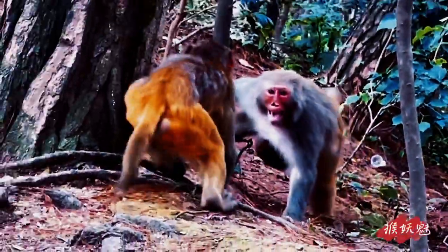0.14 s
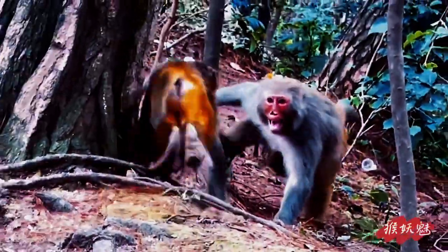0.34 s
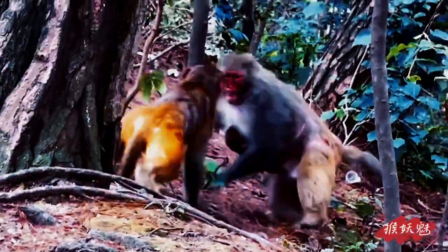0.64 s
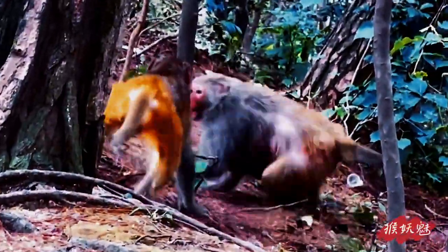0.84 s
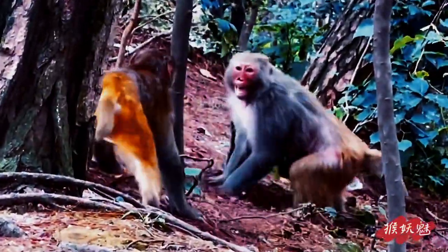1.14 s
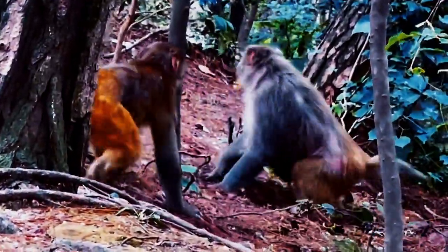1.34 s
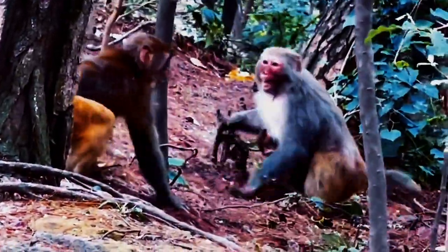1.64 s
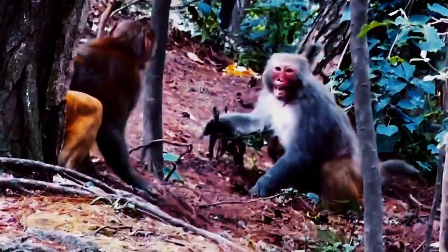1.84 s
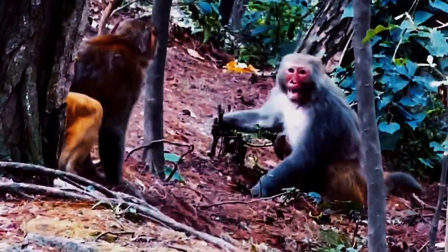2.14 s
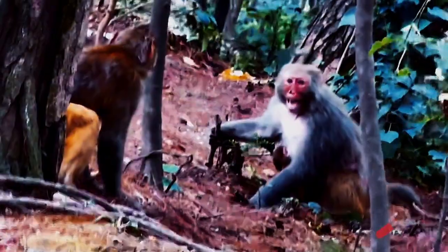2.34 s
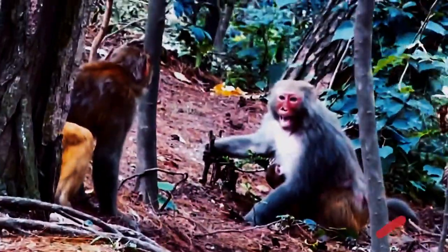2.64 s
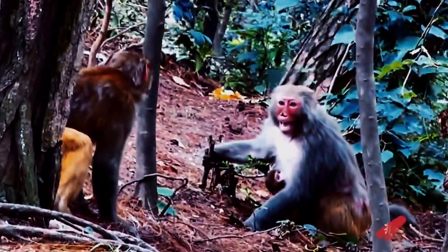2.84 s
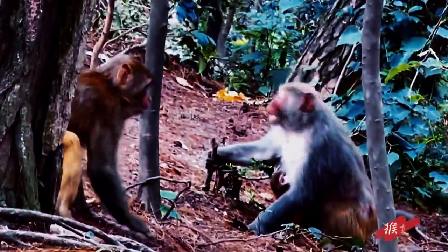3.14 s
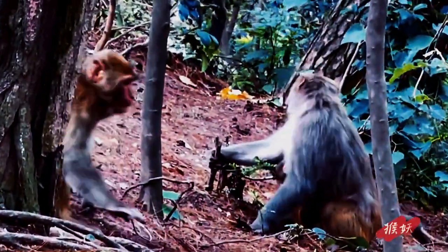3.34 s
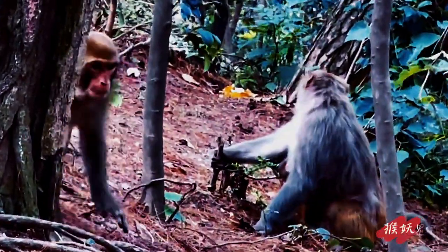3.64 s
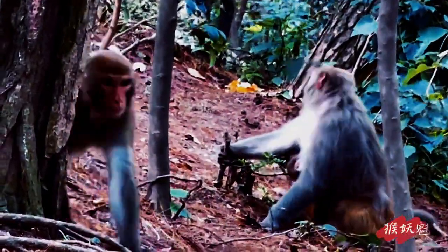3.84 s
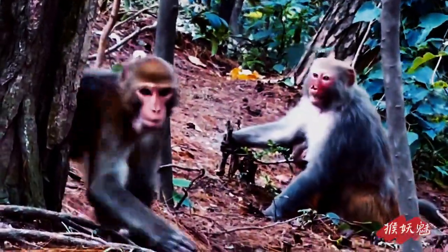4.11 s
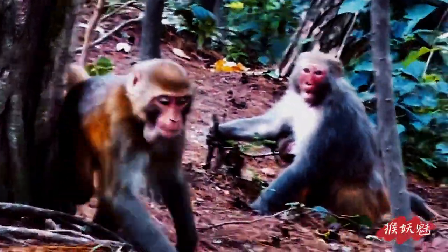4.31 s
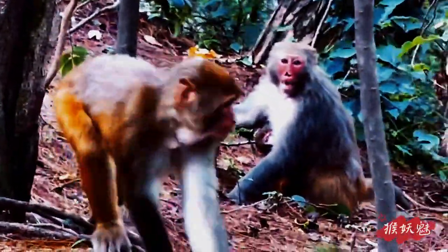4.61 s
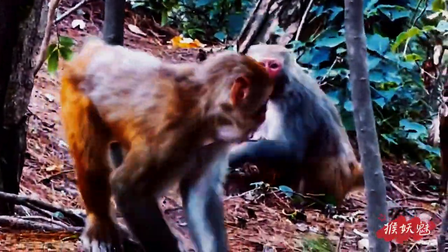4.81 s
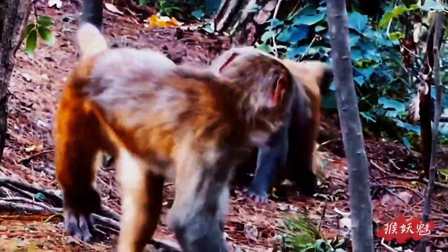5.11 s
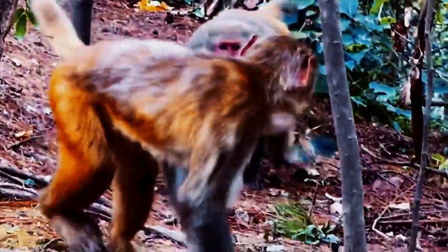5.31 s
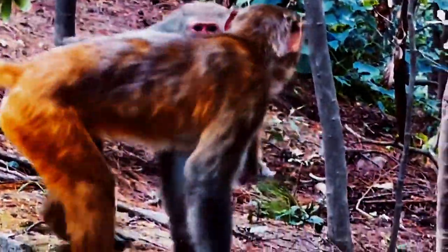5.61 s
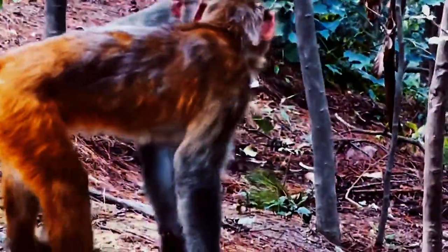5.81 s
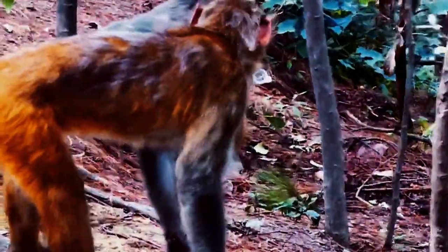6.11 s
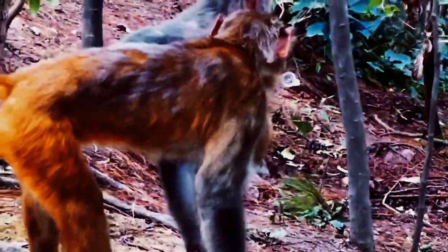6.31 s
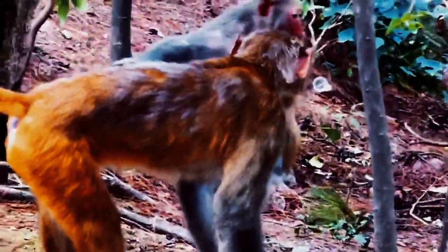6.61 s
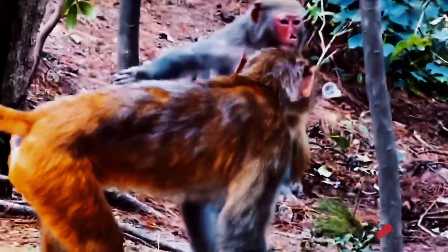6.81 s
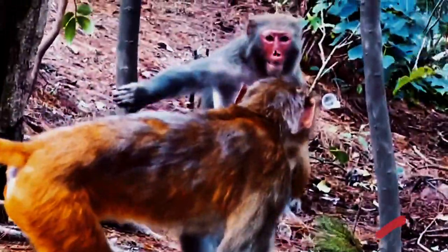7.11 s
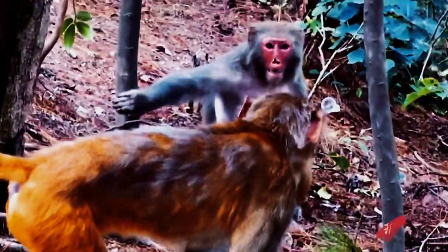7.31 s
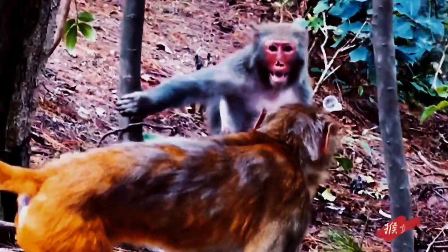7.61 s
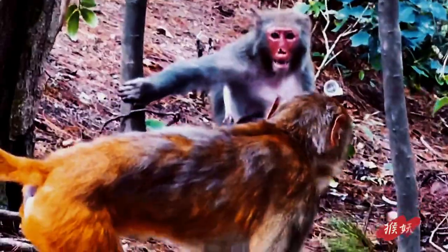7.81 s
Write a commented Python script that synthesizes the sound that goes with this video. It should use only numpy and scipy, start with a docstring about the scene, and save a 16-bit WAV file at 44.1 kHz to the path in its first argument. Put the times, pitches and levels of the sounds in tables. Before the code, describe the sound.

Close, harsh monkey shrieks come in rapid pulsed clusters, thinning between bouts to quiet woods, while brief voice breaks, croaks and twig snaps punctuate the quarrel.

```python
"""Macaques squabble on a forest floor a few steps from a small two-port microphone.
From 0 s screams and yelps, a whistle and breath chopped by fast fold flutter, ring over the rumble and hiss
of the woods; trunks echo them. From 0.3 s come harmonic squeals and whoops, damped snaps of twigs and feet,
and hoarse croaks; groans sag from 1.3 s, voices break upward from 4.4 s; just after 6.6 s the leaf hiss fades."""
import sys
import numpy as np
from scipy import signal
from scipy.fft import rfft, irfft
from scipy.io import wavfile
from scipy.ndimage import uniform_filter1d

SR = 44100
rng = np.random.default_rng(int(sys.argv[2]) if len(sys.argv) > 2 else 0)


def wav_out(sig):
    """Save sig, one row per channel (or a flat mono array), as 16-bit PCM at SR to the path in sys.argv[1]."""
    wavfile.write(sys.argv[1], SR, np.round(np.clip(np.atleast_2d(sig).T, -1, 1) * 32767).astype(np.int16))


def ratio_of_db(decibels):
    """Turn decibels (scalar or array-like) into linear amplitude factors; 0 dB maps to 1."""
    return 10 ** (np.asarray(decibels, float) / 20)


N = 350595

# woods spectrum: (frequency [Hz], relative density [dB])
WOODS = [(55, -1.5), (75, 1.5), (120, -8), (250, -16.5), (700, -23), (2000, -31.5), (7000, -48),
         (11000, -66)]
WOODS_RMS_DB = -38
# rustle of leaves as an animal shifts, end values held: (time [s], rms level [dB])
RUSTLE = [(6.3, -52), (6.62, -53.5), (6.7, -61)]

# pace of the fold flutter: (time [s], mean pace [bursts per s])
FLUTTER = [(0, 291), (1.4, 271), (1.599, 300), (2.7, 278), (3.401, 376), (5.52, 290), (5.6, 308),
           (5.669, 250)]
# throat resonances under the rasp, low then high: (frequency [Hz], pole width [Hz], relative level [dB])
THROAT = [(2550, 315, 1), (3300, 1120, -5), (4167, 710, 0.5)]
MOUTH = [(5590, 1810, 8), (8220, 1230, -6), (10360, 1920, 3), (11600, 1200, -35)]

# drawn-out screams:
# (start [s], length [s], effort at height [dB], whistle at height [Hz], treble re effort at height [dB])
SCREAMS = [(0, 0.38, -28, 4490, -1), (0.777, 0.6, -28, 5865, 3), (3.36, 0.57, -40.5, 5600, 6),
           (5.35, 0.25, -26.5, 6250, -8.5), (5.542, 0.093, -21.5, 4600, 2), (7.455, .09, -37, 4500, 4)]
# whistle at the ends; effort and treble at the ends re the height; extra fall at the very end
SCREAM_END_HZ, SCREAM_END_DB, SCREAM_END_TREBLE_DB, SCREAM_DYING_DB = 4000, -1.5, -10, -10
SCREAM_LEAN, SCREAM_FLAT = .85, .6  # exponents that shape the arch
# hoarse rising starts of a bout: (start [s], length [s], peak effort [dB], first pitch [Hz], last pitch [Hz])
CROAKS = [(0.529, 0.071, -29.5, 897, 2610), (2.358, .026, -38.5, 1000, 1498),
          (4.846, .026, -39, 1100, 1800), (3.195, .035, -44, 700, 1000), (5.292, .018, -38, 1000, 1500),
          (6.234, .075, -38, 999, 1901), (7.428, .025, -38, 1000, 1507)]
CROAK_TREBLE_DB = -13
# hoarse groans as a bout runs out of breath:
# (start [s], length [s], first effort [dB], first pitch [Hz], last pitch [Hz])
GROANS = [(1.336, 0.058, -19, 2187, 1206), (1.939, 0.22, -14.5, 3712, 1400), (2.68, .19, -16, 2950, 1300),
          (6.081, .08, -31, 2336, 1287)]
GROAN_FADE_DB, GROAN_FADE_BEND, GROAN_SAG_BEND, GROAN_TREBLE_DB = -22.5, 1.2, 2.6, -14

# short pulsed yelps:
# (loudest time [s], length [s], top effort [dB], lowest whistle [Hz], treble re effort [dB])
YELPS = [(.024, 0.065, -13.5, 2600, -9.5), (.125, 0.088, -11.5, 2650, -24), (0.224, 0.096, -11, 2450, -22),
         (.309, .062, -12, 2700, -10.5), (0.649, 0.063, -15.5, 3300, -12), (.752, 0.093, -13.5, 2400, -9.5),
         (0.863, 0.089, -16.5, 2450, -13), (0.97, .067, -25.5, 2900, 4), (1.063, 0.072, -18.5, 2400, 0),
         (1.156, .074, -16, 2450, -2), (1.249, 0.081, -13, 2500, -7), (1.334, 0.068, -18, 2200, -11),
         (1.721, 0.068, -12, 3300, -7), (1.828, 0.082, -15, 2550, -6), (1.919, .076, -14.5, 2600, -8),
         (2.491, 0.067, -8, 3000, -18.5), (2.586, 0.082, -9.5, 2900, -17.5),
         (2.667, 0.063, -9, 3000, -18.5), (3.331, 0.059, -25.5, 2900, -10), (3.818, .082, -28, 2550, -19),
         (4.486, 0.018, -20.5, 3000, -16), (4.961, 0.051, -15, 2900, -9), (5.643, .053, -9, 2650, -19.5),
         (5.696, 0.062, -12.5, 3100, -22), (5.747, .05, -22, 2300, -12), (5.837, 0.07, -9.5, 2550, -20.5),
         (5.95, .078, -15.5, 2500, -13), (6.048, 0.072, -15.5, 2450, -19), (7.579, 0.03, -14, 2803, -15)]
YELP_RISE_SHARE = .45

# clean squeals inside a bout: (start [s], length [s], first level [dB], first pitch [Hz], last pitch [Hz])
SQUEALS = [(0.322, .061, -17, 2620, 2287), (2.008, 0.14, -25, 2646, 1675),
           (2.736, 0.064, -21.5, 3706, 2480), (5.768, .05, -21, 2230, 3200),
           (5.844, 0.027, -14, 2523, 2575)]
SQUEAL_FADE_DB, SQUEAL_SLIDE_BEND = -4, .85
# clean rising whoops: (start [s], length [s], level once open [dB], first pitch [Hz], last pitch [Hz])
WHOOPS = [(0.564, 0.021, -25.5, 1710, 2720), (1.601, .033, -27.5, 699.7, 2020),
          (2.38, .033, -26, 1420, 2265), (3.199, .028, -35, 1150, 1800), (3.236, 0.021, -35, 1407, 1960),
          (4.318, 0.051, -27, 880, 2000), (4.368, .012, -26, 1906, 2490), (4.869, .031, -23, 1657, 2380),
          (5.307, 0.018, -25.5, 1497, 2308), (6.272, 0.019, -34, 1384, 2248),
          (7.435, 0.047, -25.5, 960, 2113)]
# muffled below the open pitch; overtones weaken per dB below the full level
WHOOP_OPEN_HZ, WHOOP_MUFFLE_DB_PER_OCTAVE = 1726, 17
WHOOP_FULL_DB, WHOOP_DULLING_DB_PER_DB = -24, 1.1
# what the throat lets out of a partial, applied re the fundamental: (frequency [Hz], gain [dB])
WHOOP_THROAT = [(1500, -3), (3200, 3.5), (4500, -6), (7000, -8.5), (13000, -7.5)]
# voice breaking upward out of a whoop:
# (start [s], length [s], level under the accent [dB], first pitch [Hz], highest pitch [Hz])
BREAKS = [(4.377, 0.094, -29.5, 3006, 4040), (4.895, .019, -28, 2980, 3840), (5.325, .03, -27, 2600, 3650),
          (7.479, 0.058, -30.5, 2857, 4280)]
BREAK_ACCENT_DB, BREAK_ACCENT_S, BREAK_CREST_SHARE = 10.5, 0.013, .85
THIN_DB = -8  # overtones of breaks and squeals re those of a full whoop
WOBBLE_SHARE = .012  # slow rms pitch wobble of every clean call

# twigs and feet: (time [s], ring onset level [dB], ring [Hz], t60 [s])
SNAPS = [(.403, -13, 570, 0.01), (0.406, -20.5, 85, 0.13), (3.606, -23.5, 1620, 0.0061),
         (6.369, -28, 2600, 0.008), (6.375, -21.5, 2400, 0.014)]

# phase between the two output channels, left ahead where positive: (frequency [Hz], phase [half turns])
CHANNEL_PHASE = [(60, 0), (700, -.17), (1500, 0), (3800, .12), (4400, .4), (4850, 1), (5200, 1.7),
                 (5600, 2), (6400, 2), (8300, 3), (9550, 3), (9700, 4), (10300, 4.1), (10950, 5),
                 (11600, 6), (13100, 6), (14300, 7)]
# likeness of the channels: (frequency [Hz], correlation [0 to 1])
ALIKE = [(130, 1), (700, .62), (1300, .96), (3800, .9), (4900, .85), (5600, 1), (6400, 1), (7400, .5),
         (8300, 1), (9700, 1), (10800, .6), (11800, 1)]
# left minus right: (frequency [Hz], level difference [dB])
BALANCE_DB = [(130, 0), (400, 3.5), (1000, 0)]
# microphone response: (frequency [Hz], gain [dB])
MICROPHONE = [(25, -25), (58, -0.5), (12300, -1.5), (12600, -22), (15000, -4)]


def evened(x):
    """Scales to rms 1."""
    return x / np.sqrt(np.mean(x ** 2) + 1e-20)


def read(points, hz):
    """Reads a spectrum on a log-frequency axis."""
    f, value = np.transpose(points)
    return np.interp(np.log(hz + 1), np.log(f + 1), value)


def wander(size, span):
    """Slow chance of rms 1 that changes over span samples."""
    noise = rng.standard_normal(size)
    return evened(uniform_filter1d(uniform_filter1d(noise, span), span))


def resonate(x, hz, width_hz):
    """Double-pole resonance of gain 1: shifts hz down to 0, low-passes, shifts back."""
    turn = np.exp(2j * np.pi * np.cumsum(hz * np.ones(len(x))) / SR)
    r = np.exp(-np.pi * width_hz / SR)
    return 2 * (turn * signal.lfilter([(1 - r) ** 2], [1, -2 * r, r * r], x / turn)).real


def through(x, modes):
    """Sums fixed resonances with alternating sign, to rms 1."""
    total = 0
    for k, (hz, width_hz, db) in enumerate(modes):
        total = total + (-1) ** k * ratio_of_db(db) * resonate(x, hz, width_hz)
    return evened(total)


def rasp(effort, hz, treble_db, air, cycles, throat_db, blur_hz,
         jitter=.04, shimmer_db=1.5, leak=.07, octave_db=-6):
    """A wavering whistle and breath noise, both chopped into bursts by the flutter."""
    pace_hz = np.interp(np.arange(N) / SR, *np.transpose(FLUTTER)) * (1 + jitter * wander(N, span=120))
    turns = np.cumsum(pace_hz) / SR
    index = turns.astype(int)
    strength = ratio_of_db(shimmer_db * rng.standard_normal(4000))[index]
    age = turns % 1 * hz / pace_hz / cycles  # a burst lasts a few whistle cycles, so high screams click
    burst = strength * (age * np.exp(1 - age)) ** 2 + leak
    angle = 2 * np.pi * np.cumsum(hz + blur_hz * wander(N, span=40)) / SR
    angle += .5 * rng.standard_normal(4000)[index]  # the whistle restarts out of step in each burst
    pulses = evened(np.diff(np.floor(turns), prepend=0) * strength)
    breath = (1 - air) * pulses + air * evened(burst * rng.standard_normal(N))
    whistle = evened(burst * np.cos(angle))
    octave = evened(burst ** 2 * np.cos(2 * angle))
    low = whistle + ratio_of_db(throat_db + treble_db / 2) * through(breath, THROAT)
    treble = through(breath, MOUTH) + ratio_of_db(octave_db) * octave
    return effort * (evened(low) + ratio_of_db(treble_db) * treble)


def woods():
    """Random short-time spectra: patchy hiss, lumps in the bass, and a leaf rustle, for two channels."""
    frames, hz = N // 256 + 5, np.fft.rfftfreq(1024, 1 / SR)
    real, imag = rng.standard_normal((2, 2, len(hz), frames))
    patches = rng.standard_normal((len(hz), frames))
    patches = evened(uniform_filter1d(uniform_filter1d(patches, size=10, axis=0), size=14, axis=1))
    lumps = wander(frames, span=12) / (1 + (hz[:, None] / 150) ** 2)
    flicker_db = 1.2 * patches + 2.5 * lumps
    spectra = (real + 1j * imag) * ratio_of_db(read(WOODS, hz)[:, None] + flicker_db)
    hiss = signal.istft(spectra, nperseg=1024, noverlap=768)[1][:, :N]
    leaf_modes = [(7450, 7900, -5), (10750, 620, -6)]
    leaves = [through(noise, leaf_modes) for noise in rng.standard_normal((2, N))]
    rustle_db = np.interp(np.arange(N) / SR, *np.transpose(RUSTLE))
    return ratio_of_db(WOODS_RMS_DB) * evened(hiss) + ratio_of_db(rustle_db) * leaves


def screams():
    """Arched screams, rising croaks and sagging groans drive a rasp hoarser than the yelps'."""
    effort, hz, treble_db = np.zeros(N), np.full(N, 2600.), np.zeros(N)

    def during(start_s, length_s):
        """Sample range of a call and its course from 0 to 1."""
        at = slice(round(start_s * SR), round((start_s + length_s) * SR))
        return at, np.linspace(0, 1, at.stop - at.start)

    for start_s, length_s, db, top_hz, bright_db in SCREAMS:
        at, u = during(start_s, length_s)
        low = 1 - abs(np.sin(np.pi * u ** SCREAM_LEAN)) ** SCREAM_FLAT  # 0 at the height, 1 at the ends
        effort[at] = ratio_of_db(db + SCREAM_END_DB * low + SCREAM_DYING_DB * u ** 10.6)
        hz[at] = top_hz + (SCREAM_END_HZ - top_hz) * low
        treble_db[at] = bright_db + SCREAM_END_TREBLE_DB * low
    for start_s, length_s, db, first_hz, last_hz in GROANS:
        at, u = during(start_s, length_s)
        effort[at] = ratio_of_db(db + GROAN_FADE_DB * u ** GROAN_FADE_BEND)
        hz[at] = first_hz + (last_hz - first_hz) * u ** GROAN_SAG_BEND
        treble_db[at] = GROAN_TREBLE_DB
    for start_s, length_s, db, first_hz, last_hz in CROAKS:
        at, u = during(start_s, length_s)
        effort[at] = ratio_of_db(db) * abs(np.sin(np.pi * u)) ** .5
        hz[at] = first_hz + (last_hz - first_hz) * u
        treble_db[at] = CROAK_TREBLE_DB
    effort = uniform_filter1d(effort, size=400)
    return rasp(effort, hz, treble_db, air=.75, cycles=2.6, throat_db=-6, blur_hz=350)


def yelps(edge_db=-15, swoop_share=.5, lift_share=.2):
    """Each yelp swells to its top while the whistle swoops down, then lifts a little as it dies."""
    t = np.arange(N) / SR
    effort, hz, treble_db = np.zeros(N), np.full(N, 2600.), np.zeros(N)
    for top_s, length_s, db, low_hz, bright_db in YELPS:
        side_share = np.where(t < top_s, YELP_RISE_SHARE, 1 - YELP_RISE_SHARE)
        off = (t - top_s) / length_s / side_share  # -1 at the start, 0 at the top, 1 at the end
        on = abs(off) < 1
        off = off[on]
        effort[on] = ratio_of_db(db + edge_db * abs(off) ** 2.6)
        hz[on] = low_hz * (1 + np.where(off < 0, swoop_share, lift_share) * off ** 2)
        treble_db[on] = bright_db
    effort = uniform_filter1d(effort, size=200)
    return rasp(effort, hz, treble_db, air=.55, cycles=3.4, throat_db=2, blur_hz=130)


def trunks(x, t60_s=0.5, treble_t60_s=0.35):
    """Echoes scattered by the trees: sparse taps that die faster in the treble."""
    taps = rng.choice([-1., 1.], SR) * (rng.random(SR) < .05) * (np.arange(SR) > 300)
    hz, t, z = signal.stft(taps, SR, nperseg=256)
    decay_s = read([(2000, t60_s), (10000, treble_t60_s)], hz)[:, None]
    tail = signal.istft(z * ratio_of_db(-60 * t / decay_s), SR, nperseg=256)[1]
    return signal.fftconvolve(x, tail / np.linalg.norm(tail))[:N]


def glides():
    """Yields start [s], pitch curve [Hz], level curve [dB] and overtone level [dB] of every clean call."""
    for start_s, length_s, db, first_hz, last_hz in SQUEALS:
        u = np.linspace(0, 1, round(length_s * SR))
        hz = first_hz + (last_hz - first_hz) * u ** SQUEAL_SLIDE_BEND
        yield start_s, hz, db + SQUEAL_FADE_DB * u, THIN_DB
    for start_s, length_s, db, first_hz, last_hz in WHOOPS:
        u = np.linspace(0, 1, round(length_s * SR))
        hz = first_hz + (last_hz - first_hz) * u
        muffle_db = WHOOP_MUFFLE_DB_PER_OCTAVE * np.minimum(np.log2(hz / WHOOP_OPEN_HZ), 0)
        yield start_s, hz, db + muffle_db, WHOOP_DULLING_DB_PER_DB * min(db - WHOOP_FULL_DB, 0)
    for start_s, length_s, db, first_hz, top_hz in BREAKS:
        u = np.linspace(0, 1, round(length_s * SR))
        hz = first_hz + (top_hz - first_hz) * (1 - (1 - u / BREAK_CREST_SHARE) ** 2)
        accent_db = BREAK_ACCENT_DB * np.exp(-u * length_s / BREAK_ACCENT_S)
        yield start_s, hz, db + accent_db, THIN_DB


def whoops(slope_db=-5, flicker_db=2.2, waver_share=.009, hoarse_rad=.25, breath_db=-14, hiss_db=-23):
    """Harmonic glides coloured by the throat, the upper partials blurred, over some breath."""
    out = np.zeros(N)
    noise = rng.standard_normal(N)
    breath = ratio_of_db(breath_db) * through(noise, THROAT + [(1270, 2450, 0)])
    air = breath + ratio_of_db(hiss_db) * through(noise, MOUTH)
    for start_s, hz, db, overtone_db in glides():
        size, start = len(hz), round(start_s * SR)
        at = slice(start, start + size)
        hz = hz * (1 + waver_share * wander(size, span=70) + WOBBLE_SHARE * wander(size, span=350))
        angle = 2 * np.pi * np.cumsum(hz) / SR
        shake = hoarse_rad * wander(size, span=25)
        stack = np.zeros(size)
        for k in range(1, 6):
            throat_db = read(WHOOP_THROAT, k * hz) - read(WHOOP_THROAT, hz)
            partial_db = slope_db * (k - 1.5) + overtone_db * (k > 1) + throat_db
            stack += ratio_of_db(partial_db) * np.cos(k * angle + (k - 1) * shake)
        level = ratio_of_db(db + flicker_db * wander(size, span=90))
        out[at] += level * (np.sqrt(2) * stack + air[at]) * signal.windows.tukey(size, .2)
    return out


def snaps(crack=1.0):
    """Each is a damped ring under a brief noise crack, weaker for rings below 2 kHz."""
    out, t = np.zeros(N), np.arange(6000) / SR
    for start_s, db, hz, t60_s in SNAPS:
        ring = ratio_of_db(-60 * t / t60_s) * np.sin(2 * np.pi * hz * t)
        click = crack * min(hz / 2000, 1) * np.exp(-t / 0.00033) * rng.standard_normal(len(t))
        out[round(start_s * SR):][:len(t)] += ratio_of_db(db) * (ring + click)
    return out


def scene():
    """What both channels share, and what differs between them, spread by likeness, phase and balance."""
    near = screams() + yelps() + whoops() + snaps()
    shared, other = woods()
    wet = near + ratio_of_db(-12.5) * trunks(near)
    shared = rfft(shared + wet)
    other = rfft(other + wet * wander(N, span=150))
    hz = np.fft.rfftfreq(N, 1 / SR)
    spread = np.arccos(np.clip(read(ALIKE, hz), 0, 1)) / 2
    # each channel takes half the phase and half the level difference
    tilt = np.exp(.5j * np.pi * read(CHANNEL_PHASE, hz)) * ratio_of_db(read(BALANCE_DB, hz) / 2)
    response = ratio_of_db(read(MICROPHONE, hz))
    mid = response * np.cos(spread) * shared
    side = response * np.sin(spread) * other
    return irfft([(mid + side) * tilt, (mid - side) / tilt], N)


def roll_off(x):
    """The treble ends steeply here."""
    return signal.sosfilt(signal.butter(12, 15750, fs=SR, output="sos"), x)


def record(dry, knee_db=-34, share=0.18, recover_db_per_s=17.5, gain_db=5):
    """Gain control dips everything under and after loud sounds; then a soft overload."""
    power_db = 10 * np.log10(abs(uniform_filter1d((dry ** 2).mean(0), size=2000)) + 1e-12)
    fall_db = np.arange(N) * recover_db_per_s / SR
    held_db = np.maximum.accumulate(power_db + fall_db) - fall_db  # instant rise, steady fall
    over_db = np.maximum(held_db - knee_db, 0)
    ducked = dry * ratio_of_db(gain_db - share * uniform_filter1d(over_db, size=2000))
    mix = 1.2 * np.tanh(ducked / 1.2)
    return roll_off(mix)


dry = scene()
out = record(dry)
wav_out(out)
```